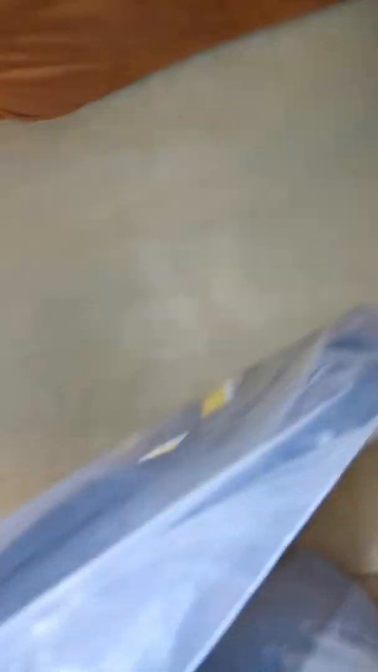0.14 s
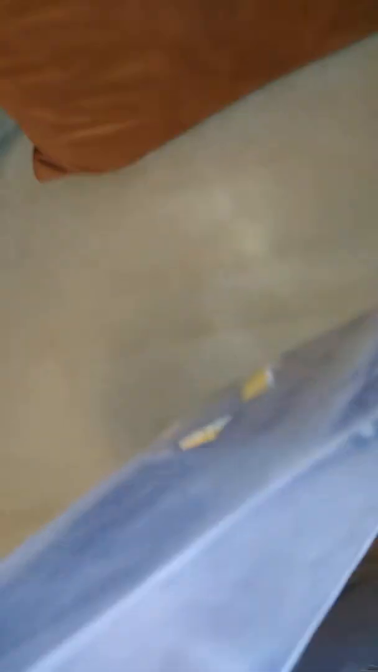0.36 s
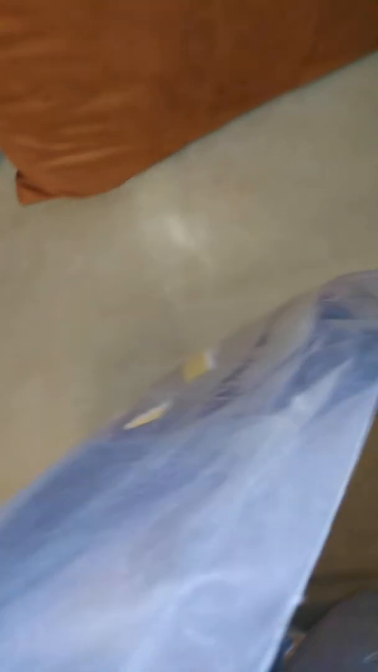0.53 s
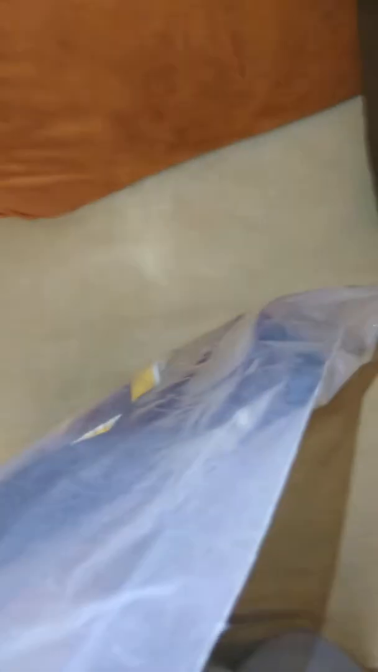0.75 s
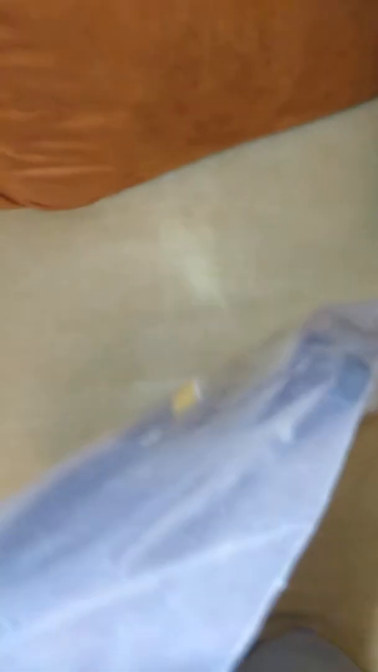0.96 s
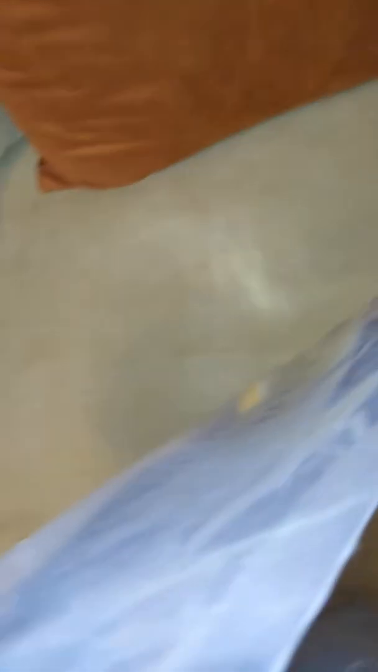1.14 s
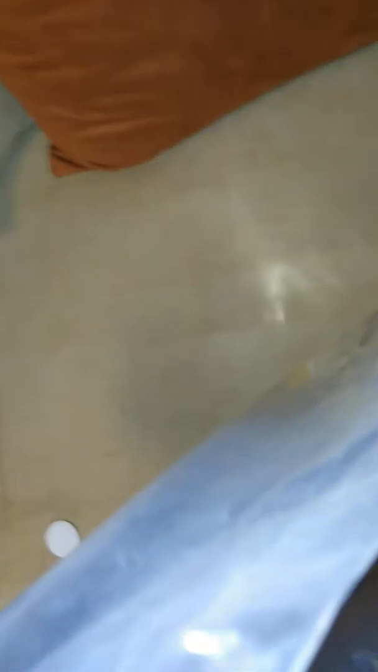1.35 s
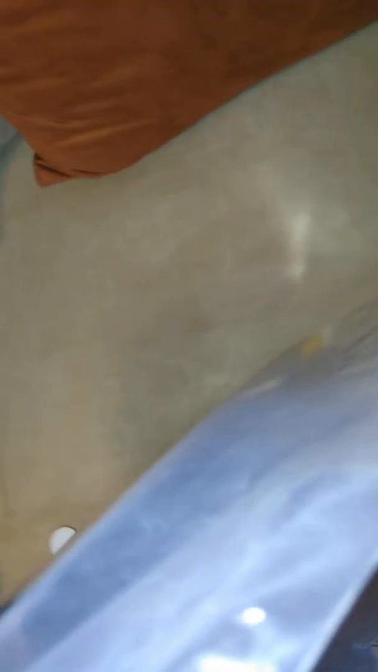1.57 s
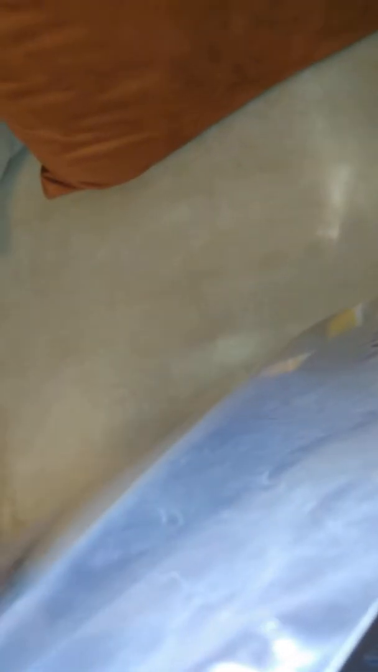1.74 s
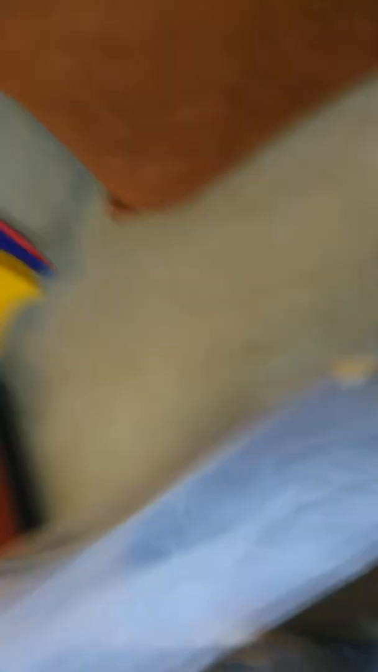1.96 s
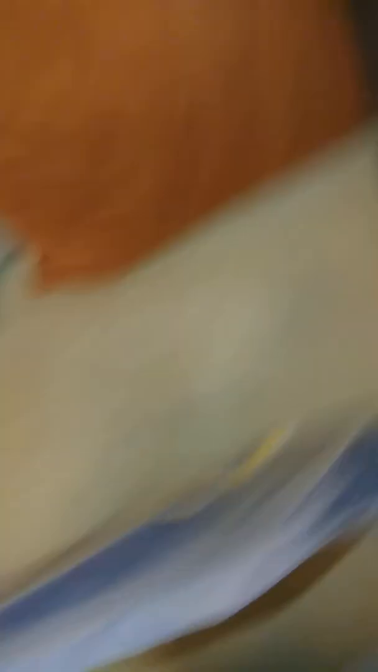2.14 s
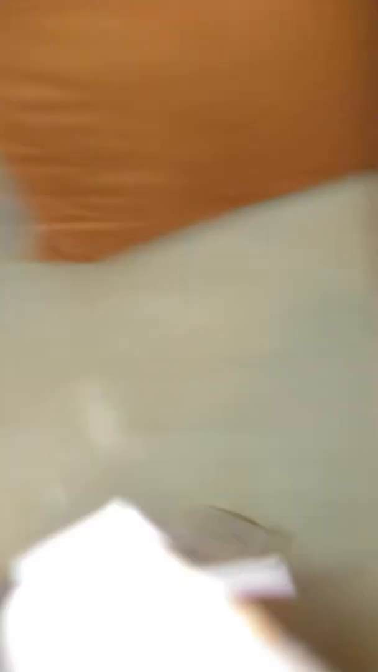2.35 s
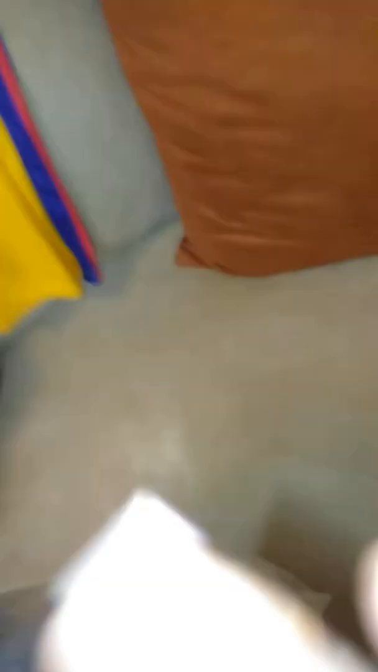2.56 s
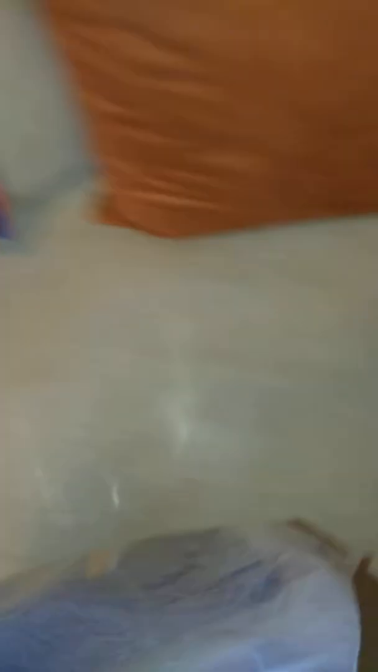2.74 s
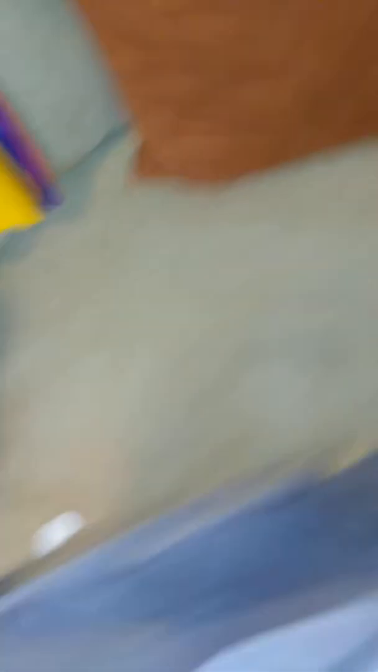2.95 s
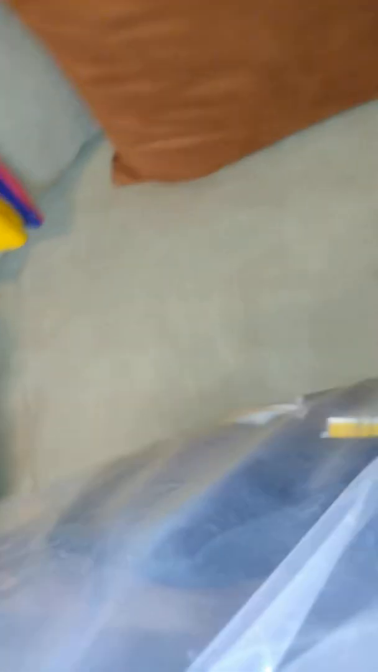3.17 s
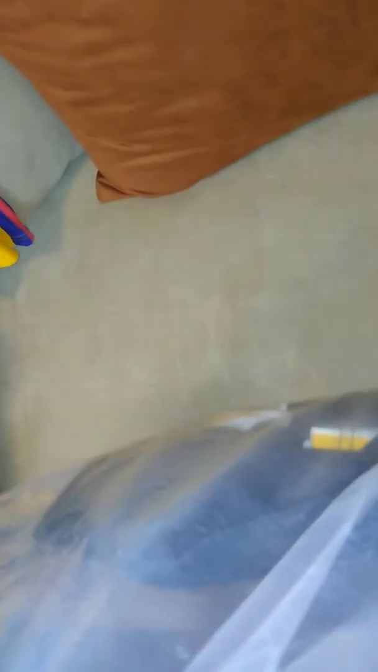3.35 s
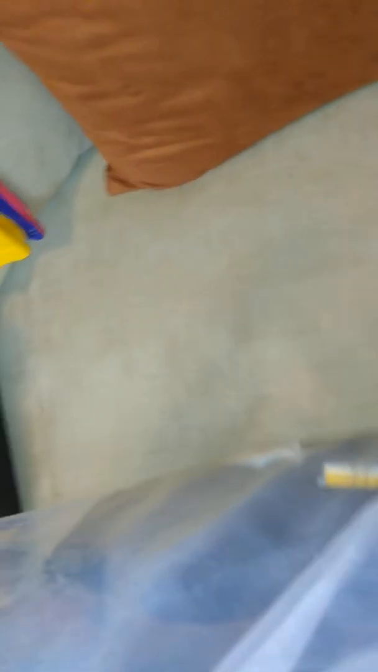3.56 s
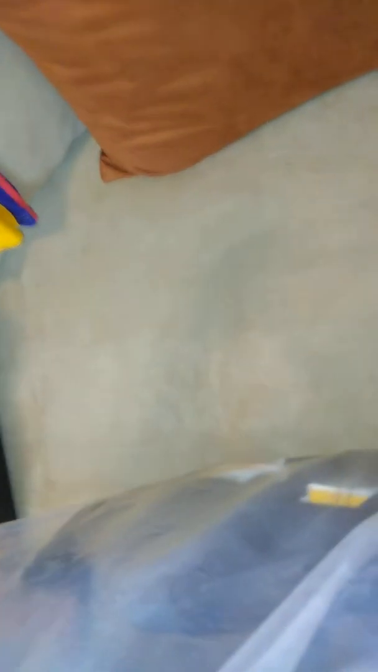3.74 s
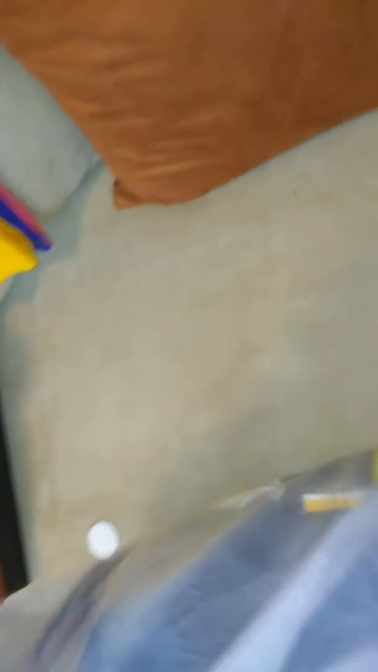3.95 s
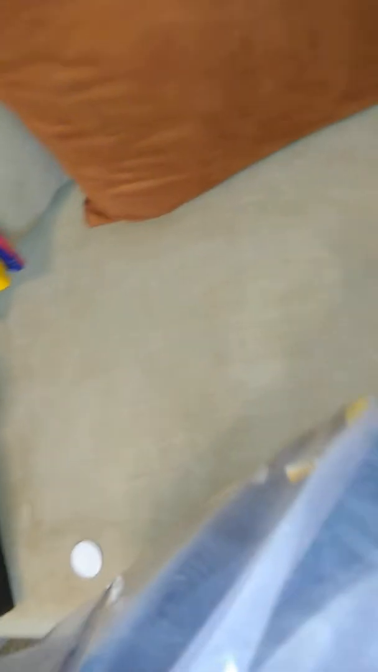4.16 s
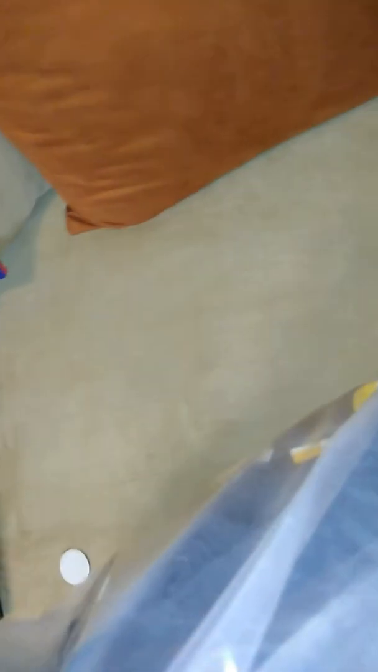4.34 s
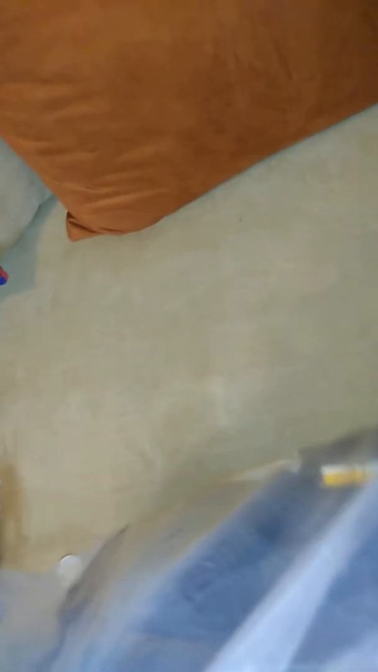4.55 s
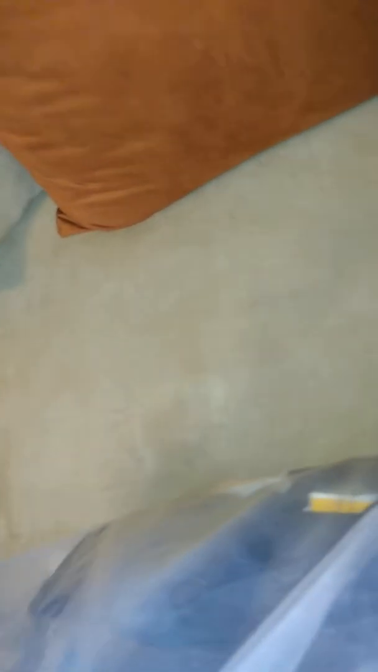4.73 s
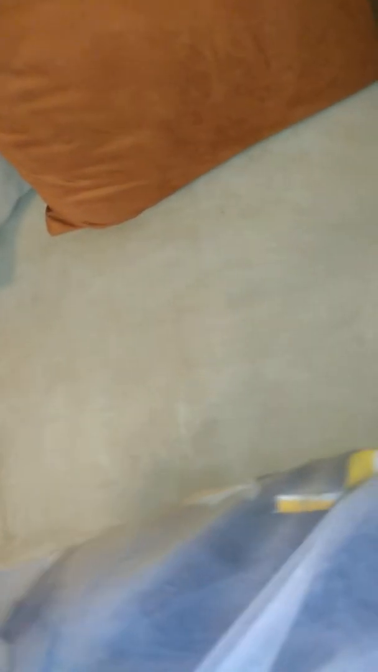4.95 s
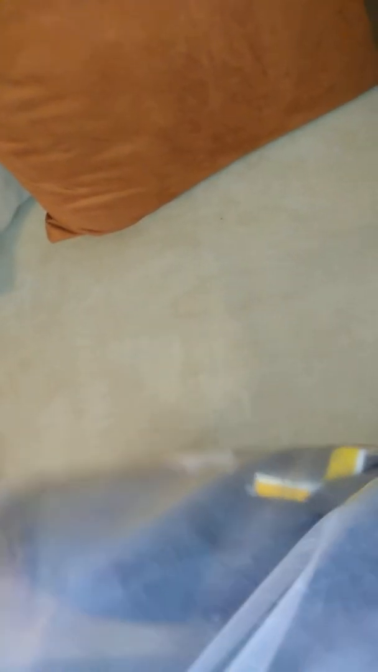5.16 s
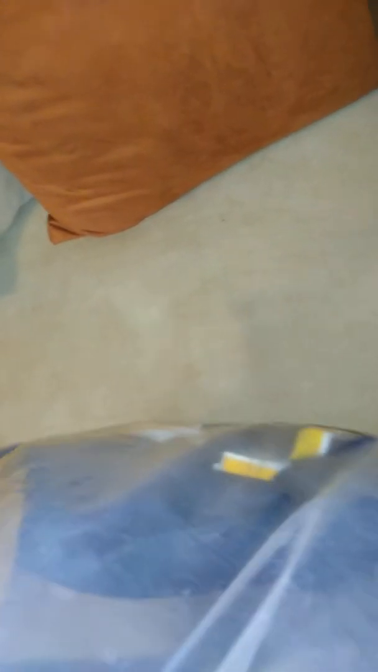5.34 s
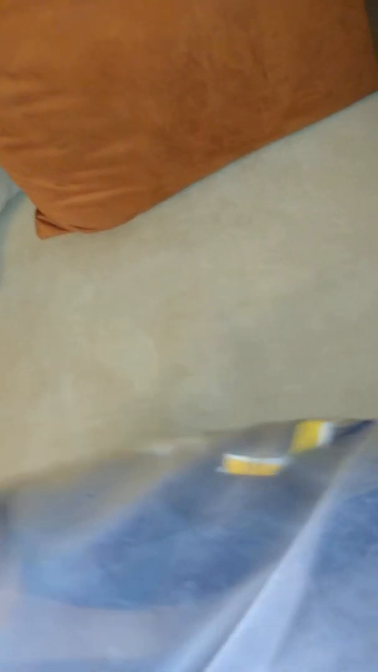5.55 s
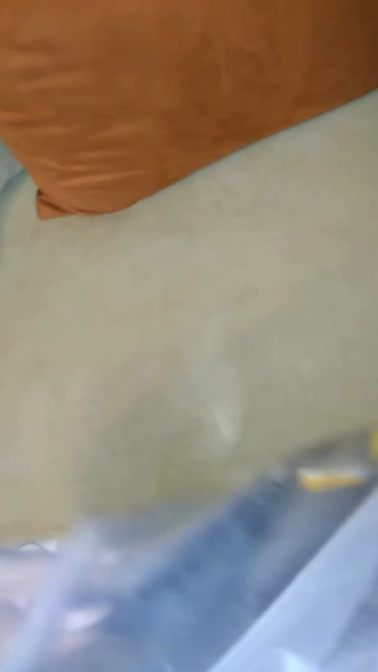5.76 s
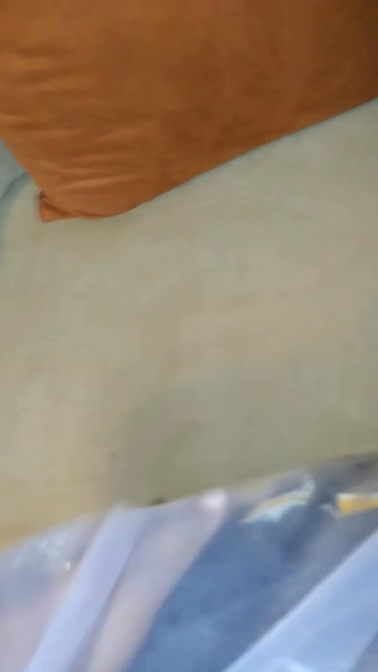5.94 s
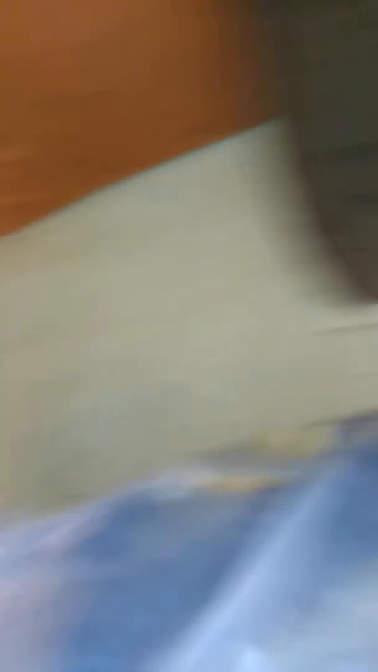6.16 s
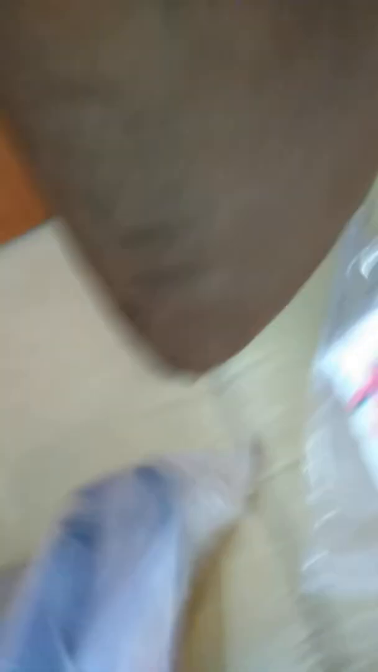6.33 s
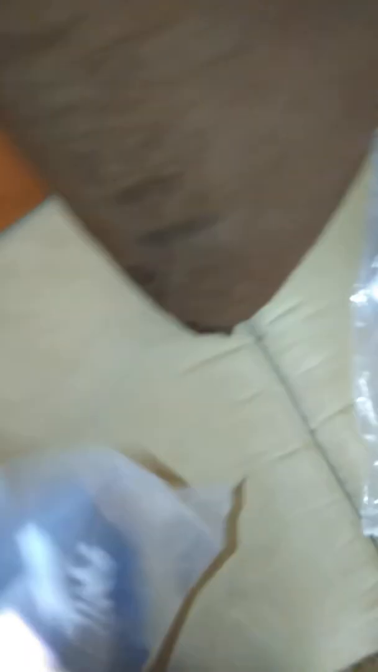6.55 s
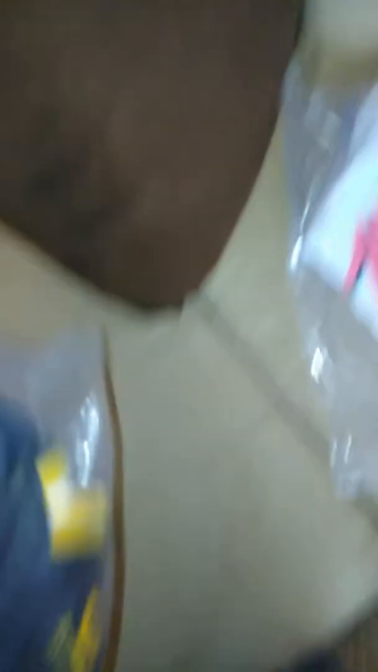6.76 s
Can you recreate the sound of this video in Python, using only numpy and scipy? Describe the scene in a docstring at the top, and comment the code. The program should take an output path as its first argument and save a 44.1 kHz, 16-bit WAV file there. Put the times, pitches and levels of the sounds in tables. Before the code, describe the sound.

Thin plastic film around folded cloth is handled against a phone in a dry, soft room, with very faint hiss and hum behind. It opens with a thump and sharp snaps, then a loud crackling flurry at 0.4-0.6 s. Hissy swipes and low bumps follow at 0.65, 1.1-1.3 and 1.5 s, with snaps clustered to 1.7 s. A dense crunch comes around 1.9-2.0 s, a lull, then the hardest scrape and thump at 2.4 s. More snaps arrive near 2.75 and 3.15 s, and a tiny faint squeak at 3.3 s. From 3.4 to 4.8 s it is much quieter, only small ticks and light rustle. Crackle rebuilds from 4.9 s, crisp by 5.5 s, and from 5.85 s busy snaps, moderate hiss and soft thumps continue to the end near 7 s. Left is bright and close; right is softer and duller.

```python
"""A thin plastic bag with cloth in it, handled right at the left microphone port of a phone in a soft room.
Creases buckle as single snaps (short ringing bursts) and as dense crackle (clicks drawn out over noise).
Film slides over the left port as bright hiss and thumps it with low, lumpy pushes of air; it squeaks once.
The right port, on the far side of the housing, gets no sliding, a rumble of its own and a duller sound,
mostly softer. Behind it all lie faint room and circuit noise and a faint hum, stronger at the right."""
import sys
import numpy as np
from scipy import signal
from scipy.io import wavfile

SR = 44100
rng = np.random.default_rng(int(sys.argv[2]) if len(sys.argv) > 2 else 0)


def int16_out(signal):
    """Quantize to a 16-bit WAV file."""
    q = np.round(np.clip(np.atleast_2d(signal).T, -1, 1) * 32767)
    wavfile.write(sys.argv[1], SR, q.astype(np.int16))


N = 299880

# All levels are those ahead of the port colours and peak rounding in record().
# room and circuit noise: [left level/dB, right level/dB]
FLOOR_DB = [-82, -80]
HUM_HZ, HUM_DB = 250, -79   # level at the right port
# film squeaking briefly: (t/s, length/s, level/dB, f/Hz)
SQUEAK = (3.312, .04, -47, 2850)

# moves of the hand, each at full strength from its start: (t/s, held/s, film sliding over the left port/dB,
# film pressing on it/dB, crackle in the air at the right port/dB, low air push/dB)
MOVES = [(0, 0.057, -28.5, -15.5, -60, -21.5), (0.179, 0.0015, -32, -23.5, -49, -33),
         (0.379, 0.028, -20.5, -22, -43, -18), (.44, 0.1, -33, -23, -41, -24),
         (0.652, 0.062, -28.5, -24.5, -48, -16.5), (0.804, 0.09, -33.5, -18, -75, -27.5),
         (1.092, .285, -20.5, -23, -48, -33), (1.202, 0.0042, -19, -40, -58, -14.5),
         (1.272, 0.022, -20, -48, -59, -14), (1.464, 0.044, -21.5, -27, -44, -24.5),
         (1.596, 0.086, -32.5, -27, -53, -30.5), (1.851, 0.07, -24, -23.5, -39, -26.5),
         (1.989, 0.01, -22, -16.5, -21, -17.5), (2.372, 0.0072, -10.5, -10, -59, -13.5),
         (2.446, 0.062, -21, -31, -71, -25.5), (2.741, 0.058, -28, -33, -32.5, -29),
         (3.001, 0.096, -50, -28.5, -38, -34.5), (3.141, 0.039, -31, -22, -25.5, -27),
         (3.83, 0.0017, -55, -33, -57, -47), (3.92, 0.094, -45.5, -43, -44, -51),
         (4.235, 0.0018, -46, -42, -47, -40), (4.369, 0.0015, -53, -41, -54, -42),
         (4.735, 0.018, -44, -34.5, -46, -36.5), (4.915, 0.085, -56, -36.5, -50, -32),
         (5.145, 0.18, -64, -34, -40.5, -43), (5.278, 0.065, -43, -44.5, -49, -37),
         (5.474, 0.2, -39, -28.5, -38, -30.5), (5.739, 0.0055, -43, -23.5, -31, -25),
         (5.853, 0.12, -42, -35.5, -36.5, -41), (6.008, 0.0017, -28, -33, -37.5, -18.5),
         (6.227, 0.079, -32.5, -25.5, -40, -29.5), (6.376, 0.061, -30, -28, -46, -26.5),
         (6.558, 0.064, -33, -31.5, -40.5, -28.5), (6.699, 0.14, -31.5, -34, -34.5, -38.5)]
RISE_DB_PER_S, FALL_DB_PER_S = 660, 292   # a short squeeze swells fast and lets go more slowly
DRAG_S, LIFT_DB_PER_S = 0.085, 509   # a move held longer is a drag, which ends when the film lifts off
# rustle between the moves: (t/s, pressing level/dB, crackle level/dB, air push level/dB, airy hiss level/dB)
REST_RUSTLE = [(0, -76, -46.5, -34, -46), (.7, -20, -40.5, -37.5, -46.5), (.88, -36.5, -64, -31, -65),
               (.97, -37.5, -47, -37, -42.5), (1.42, -37, -47, -28, -51), (2.2, -47.5, -49, -51.5, -60),
               (2.55, -34, -55.5, -35, -41), (2.9, -40.5, -51, -41, -54.5), (3.45, -41.5, -49.5, -56, -50),
               (3.78, -46, -49.5, -66, -56.5), (4.4, -44, -57.5, -50, -55.5), (4.67, -50, -61.5, -60, -69),
               (4.82, -46, -49, -41, -59), (5.41, -56.5, -49.5, -53, -63), (5.65, -41, -45.5, -31, -49),
               (6.8, -35.5, -37.5, -37, -51)]
REST_SLIDE_SHARE_DB = 3   # full slide relative to the airy hiss in the rest rustle

# hiss of film sliding over the port: (f/Hz, relative level/dB per Hz)
SLIDE_SPECTRUM = [(800, -3.5), (2500, 2), (6000, -1.5), (12000, -2), (16000, -12)]
AIRY_HZ = 12130   # centre of the airy hiss of film that only brushes
# film pressing on the port: (f/Hz, relative level/dB per Hz)
THUMP_SPECTRUM = [(250, 4), (450, 7.5), (900, 5.5), (2000, -4.5), (5000, -19)]
FLAP_HZ = 118   # parts the high and low halves of the air push
# bag hanging looser and flapping lower: (t/s, boost below FLAP_HZ and equal cut above it/dB)
LOOSE_TILT = [(3.2, -0.5), (3.5, 3.5)]
# crackle of small creases: (f/Hz, relative level/dB per Hz)
FILM_SPECTRUM = [(300, -5.5), (800, 5.5), (2500, 6.5), (5000, 4), (16000, -17)]

# creases snapping: (t/s, peak level midway between the ports/dB)
SNAPS = [(0.0902, -9.5), (0.103, -3.5), (0.208, -23), (0.2164, -15), (0.2916, -12), (0.3248, -21),
         (0.3624, -15), (0.3805, -13), (0.3896, 1), (0.4364, -3.5), (0.4589, -1.5), (0.4833, -11),
         (0.5057, -3.5), (0.5387, -3), (0.5452, -7), (0.565, -5), (0.575, -11), (0.611, -13), (0.7239, -5),
         (0.8613, -11.5), (0.9092, -12), (1.008, -18.5), (1.4358, -2), (1.4769, -8), (1.508, -8),
         (1.5575, -10), (1.5795, -7.5), (1.5958, -4), (1.6732, -7.5), (1.6886, -7), (1.701, -2),
         (1.8008, -16), (1.8904, -3), (1.9627, -13), (1.9799, -6.5), (2.198, -27.5), (2.338, -20),
         (2.4373, -18), (2.6032, -13), (2.7127, -15), (2.7283, -8), (2.7505, -3), (2.775, -4.5),
         (2.815, -11.5), (2.848, -17), (2.9574, -20), (2.9977, -24), (3.0145, -20.5), (3.049, -14.5),
         (3.1443, -2), (3.1707, 1), (3.1956, -18), (3.299, -21), (3.3099, -17), (3.4515, -40), (3.63, -28),
         (3.7474, -33), (3.808, -48), (3.8328, -17), (3.8671, -27), (3.912, -25.5), (3.9749, -25),
         (3.9956, -25), (4.103, -22.5), (4.116, -22.5), (4.236, -22.5), (4.364, -18), (4.3703, -25),
         (4.4794, -22.5), (4.5436, -23), (4.6882, -34), (4.7366, -21), (4.8299, -17), (4.845, -20),
         (4.9248, -14.5), (4.9319, -7), (4.9732, -10), (4.9864, -18.5), (5.0005, -9.5), (5.056, -15.5),
         (5.121, -18.5), (5.1587, -18.5), (5.1724, -22), (5.188, -20), (5.2074, -21), (5.2455, -18),
         (5.2528, -21), (5.3174, -17.5), (5.3725, -10), (5.43, -22), (5.4475, -21), (5.4758, -16),
         (5.528, -6.5), (5.5355, -12), (5.5683, -6.5), (5.5922, -10.5), (5.6409, -6.5), (5.8335, -25),
         (5.8568, -6.5), (5.8889, -12), (5.8958, -14), (5.9315, -7), (5.9726, -4), (6.0157, -9),
         (6.0631, -7.5), (6.12, -22), (6.1524, -10.5), (6.2183, -9), (6.2285, -6), (6.264, -3),
         (6.285, -1.5), (6.2962, -7.5), (6.3586, -9.5), (6.3872, -13), (6.4015, -9), (6.4144, -6.5),
         (6.4348, -12), (6.454, -9.5), (6.5201, -17), (6.556, -9.5), (6.5852, -15), (6.6019, -6.5),
         (6.7232, -7), (6.7397, -7), (6.772, -10)]
NEAR_DB = 4.5   # the left port, nearer than the middle, gets snaps this much louder
# pitch of a 0 dB crack; weaker creases crack lower
CRACK_HZ, OCTAVES_PER_DB, OCTAVES_SPREAD = 8800, .025, .45

LEFT_PORT_HZ, LEFT_PORT_WIDTH_HZ, LEFT_PORT_DB = 11330, 900, 7.5   # resonance of the left port
RIGHT_PORT_HZ = 7630   # the right port is shaded above this
BASS_CUT_HZ, CUTOFF_HZ = 73, 16800   # both microphones


def from_db(db):
    """Decibels to gain."""
    return 10 ** (np.asarray(db) / 20)


def rms_one(x):
    """Scale to rms 1."""
    return x / np.sqrt(np.mean(x ** 2) + 1e-20)


def in_time(rows):
    """Columns of a curve table at every sample."""
    s, *columns = np.transpose(rows)
    return [np.interp(np.arange(N) / SR, s, column) for column in columns]


def drift(rate_hz):
    """Slow chance of spread 1: noise twice through a one-pole low-pass."""
    step = 20   # samples per slow value
    r = np.exp(-2 * np.pi * rate_hz * step / SR)
    noise = rng.standard_normal(N // step + 2002)
    slow = signal.lfilter([1], [1, -2 * r, r * r], noise)[2000:]   # settled part
    return np.interp(np.arange(N) / step, np.arange(len(slow)), rms_one(slow))


def filtered(x, hz, kind, order=2):
    """Butterworth filter."""
    sos = signal.butter(order, hz, kind, fs=SR, output="sos")
    return signal.sosfilt(sos, x + 1e-18)


def resonance(x, hz, width_hz):
    """Two-pole resonance of gain 1 on top."""
    r = np.exp(-np.pi * width_hz / SR)
    zeros = [(1 - r * r) / 2, 0, (r * r - 1) / 2]
    poles = [1, -2 * r * np.cos(2 * np.pi * hz / SR), r * r]
    return signal.lfilter(zeros, poles, x)


def grains(per_s, spread_db, clump_db, hiss, largest=5):
    """Random clicks of very uneven size over smooth friction noise, swelling together in clumps."""
    size_db = spread_db * np.minimum(rng.exponential(1, N), largest)
    sizes = from_db(size_db) * rng.choice([-1, 1], N)
    born = rng.random(N) < per_s / SR
    mix = rms_one(sizes * born) + hiss * rng.standard_normal(N)
    return from_db(clump_db * drift(44.4)) * mix / np.sqrt(1 + hiss ** 2)


def coloured(x, spectrum, patchy_db):
    """Half-octave bands, each with its level and its own flicker: every patch of film has another size."""
    hz, db = np.transpose(spectrum)
    edges = 30 * 2 ** np.arange(0, 9.6, .5)
    out = 0
    for k, (low, high) in enumerate(zip(edges, edges[1:])):
        level_db = np.interp(np.log(low * high) / 2, np.log(hz), db)
        gain = from_db(level_db + patchy_db * drift(40.0))
        out = out + (-1) ** k * gain * filtered(x, [low, high], "band", order=1)
    return rms_one(out)


def background():
    """Room and circuit noise in both ports, and a wavering hum of noise through a narrow resonance."""
    noise = rms_one(filtered(rng.standard_normal((2, N)), [600, 6000], "band"))
    hum = rms_one(resonance(rng.standard_normal(N), HUM_HZ, width_hz=8.7))
    return from_db(FLOOR_DB)[:, None] * noise + from_db(HUM_DB) * hum * [[.3], [1]]


def squeak():
    """A short rub of film on film, equal at both ports: noise twice through a narrow resonance."""
    s, length_s, db, hz = SQUEAK
    t = np.arange(N) / SR - s
    once = resonance(rng.standard_normal(N), hz, width_hz=97.0)
    tone = rms_one(resonance(once, hz, width_hz=97.0))
    swell = np.sin(np.pi * np.clip(t / length_s, 0, 1))
    return from_db(db) * tone * swell * [[1], [1]]


def handling():
    """Levels in dB of slide, pressing, crackle, air push and airy hiss; moves and rest add in power."""
    s, held_s, *levels_db = np.transpose(MOVES)
    t = np.arange(0, N, 40)[:, None] / SR
    fall = np.where(held_s > DRAG_S, LIFT_DB_PER_S, FALL_DB_PER_S)
    before_db = RISE_DB_PER_S * (s - t)
    after_db = fall * (t - s - held_s)
    shape_db = -np.maximum(np.maximum(before_db, after_db), 0)
    moves = []
    for db in levels_db:
        power = from_db(2 * (db + shape_db)).sum(axis=1)
        moves.append(np.interp(np.arange(N) / SR, t[:, 0], power))
    pressing_db, crackle_db, push_db, airy_db = in_time(REST_RUSTLE)
    fitful_db = 4.4 * drift(15.0)   # pressing and hiss between the moves come and go
    pressing_db, airy_db = pressing_db + fitful_db, airy_db + fitful_db
    rest_db = [airy_db + REST_SLIDE_SHARE_DB, pressing_db, crackle_db, push_db]
    totals_db = [10 * np.log10(power + from_db(2 * db)) for power, db in zip(moves, rest_db)]
    return totals_db + [airy_db]


def slide(slide_db, airy_db):
    """Film dragged over the left port: a dense, even, bright hiss that the other port does not get."""
    friction = grains(5000., spread_db=3.0, clump_db=0.0, hiss=0.1)
    hiss = coloured(friction, SLIDE_SPECTRUM, patchy_db=2.0)
    airy = rms_one(resonance(hiss, AIRY_HZ, width_hz=2100.0))
    return (from_db(slide_db) * hiss + from_db(airy_db) * airy) * [[1], [0]]


def air_push():
    """Low lumpy motion of the air under the film."""
    lumps = grains(400., spread_db=4.0, clump_db=2.0, hiss=0.42)
    return rms_one(filtered(lumps, [45, 330], "band"))


def thumps(thump_db, deep_db):
    """Soft lumpy pushes of film and of the air under it; the far port gets a rumble of its own."""
    lumps = grains(600., spread_db=3.5, clump_db=2.5, hiss=0.63, largest=3.7)
    push = filtered(coloured(lumps, THUMP_SPECTRUM, patchy_db=2.0), 261, "high", order=6)
    deep, rumble = air_push(), air_push()
    tilt = from_db(*in_time(LOOSE_TILT))
    upper = filtered(deep, FLAP_HZ, "high", order=3) / tilt
    lower = filtered(deep, FLAP_HZ, "low", order=3) * tilt
    left = from_db(thump_db) * push + from_db(deep_db) * rms_one(upper - lower)
    steady = rms_one(filtered(rumble, FLAP_HZ, "low", order=4))   # stays on at one level
    right = from_db(deep_db - 20) * rumble + from_db(-76) * steady
    return np.array([left, right])


def ticks():
    """Each tick flutters for a moment in its own way: clicks, drawn out, times fresh noise."""
    r = np.exp(-1 / (0.00069 * SR))   # decay time in s
    clicks = grains(260., spread_db=4.0, clump_db=3.0, hiss=0.16, largest=2.4)
    drawn_out = np.sqrt(signal.lfilter([1], [1, -r * r], clicks ** 2))
    return coloured(drawn_out * rng.standard_normal(N), FILM_SPECTRUM, patchy_db=4.5)


def crackle(right_db):
    """Sparse ticks of small creases through the air, louder at the near left port; the ports share a part."""
    near, other = ticks(), ticks()
    left, right = from_db(4.5) * near, rms_one(0.67 * near + other)
    return from_db(right_db) * np.array([left, right])


def snaps(right_db):
    """A crease buckles: a crack rings around the pitch of its patch of film, then flutters some milliseconds."""
    length = 800   # samples
    out, t = np.zeros((2, N + length)), np.arange(length) / SR
    chance = rng.standard_normal((len(SNAPS), 2, 2, length))   # snap, crack or body, port, sample
    rise = np.minimum(t / 0.00032, 1)
    crack_fade = np.exp(-t / 0.00024) + 0.2 * np.exp(-t / 0.0016)
    for (s, db), (high, low) in zip(SNAPS, chance):
        octaves = OCTAVES_PER_DB * db + OCTAVES_SPREAD * low[0, -1]
        hz = min(CRACK_HZ * 2 ** octaves, SR / 4)
        crack = high * rise * crack_fade
        ring = rms_one(resonance(crack, hz, 0.98 * hz))
        edge = rms_one(filtered(crack, 5200, "high"))
        body = rms_one(filtered(low * rise * np.exp(-t / 0.0024), [500, 3000], "band"))
        snap = ring + from_db(-3.5) * edge + from_db(-2.0) * body
        snap = snap / abs(snap).max(axis=1, keepdims=True)
        at = round(s * SR)
        left_db = db + NEAR_DB
        far_db = 0.71 * left_db + 0.36 * right_db[at] + 3.0   # carries to the far port when the crackle does
        out[:, at:at + length] += from_db([[left_db], [far_db]]) * snap
    return out[:, :N]


def scene():
    """Background and bag at the two ports."""
    slide_db, thump_db, right_db, deep_db, airy_db = handling()
    film_on_port = slide(slide_db, airy_db) + thumps(thump_db, deep_db)
    creases = crackle(right_db) + snaps(right_db)
    return background() + squeak() + film_on_port + creases


def record(dry):
    """Left port resonance, shaded right port, bass cut, rounded peaks, cut top."""
    ringing = resonance(dry[0], LEFT_PORT_HZ, LEFT_PORT_WIDTH_HZ)
    left = dry[0] + (from_db(LEFT_PORT_DB) - 1) * ringing
    right = filtered(dry[1], RIGHT_PORT_HZ, "low", order=5) + from_db(-19) * dry[1]
    both = filtered(np.array([left, right]), BASS_CUT_HZ, "high")
    rounded = np.tanh(both / .72) * .72
    return signal.sosfilt(signal.cheby2(14, 90, CUTOFF_HZ, fs=SR, output="sos"), rounded)


dry = scene()
out = record(dry)
int16_out(out)
```